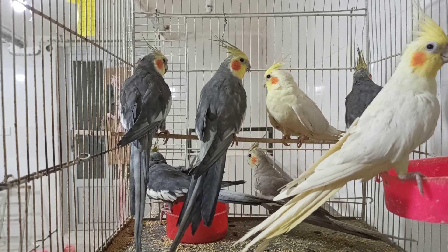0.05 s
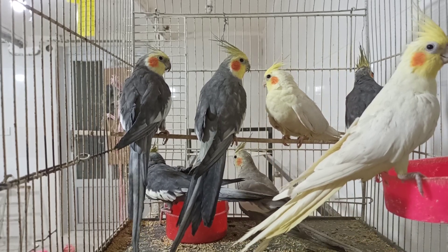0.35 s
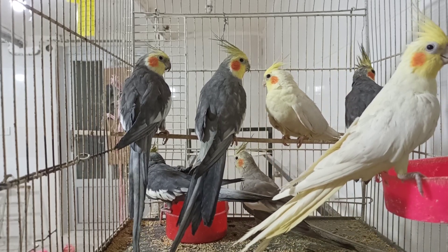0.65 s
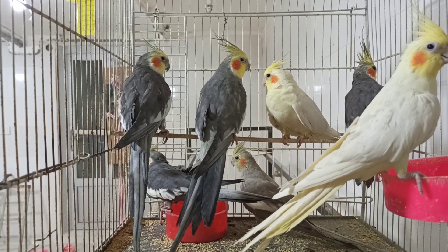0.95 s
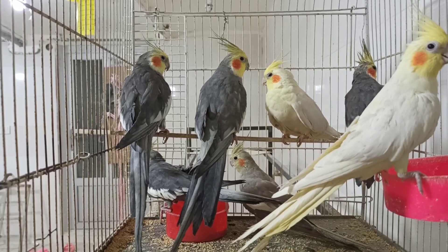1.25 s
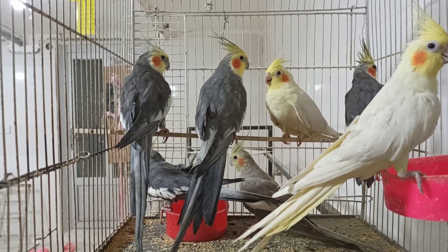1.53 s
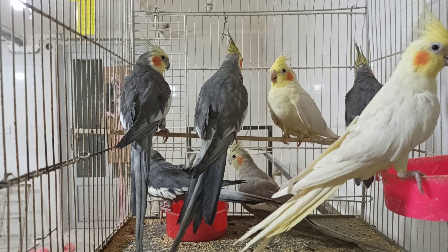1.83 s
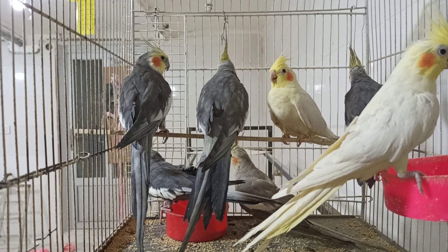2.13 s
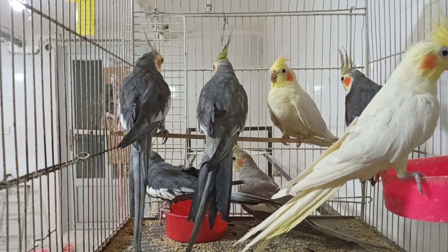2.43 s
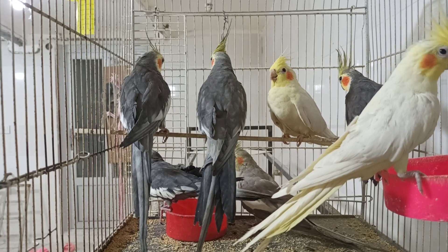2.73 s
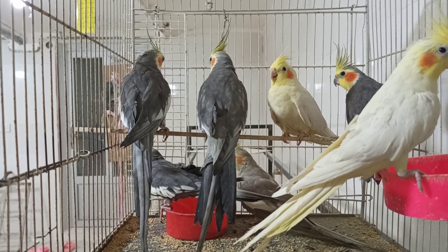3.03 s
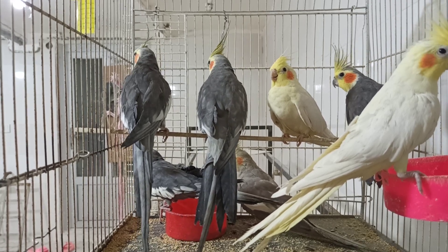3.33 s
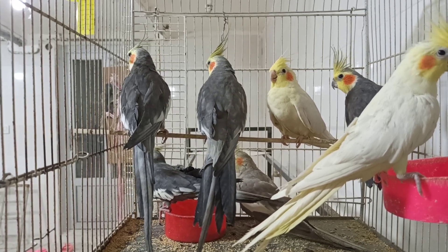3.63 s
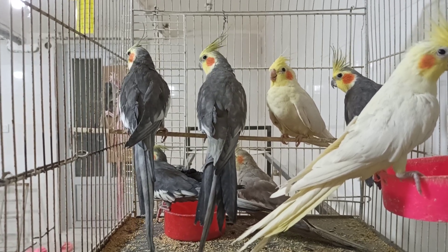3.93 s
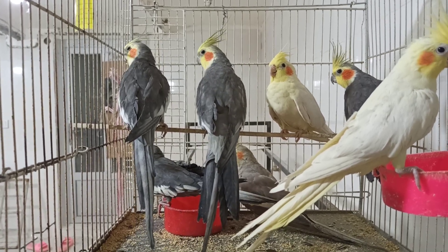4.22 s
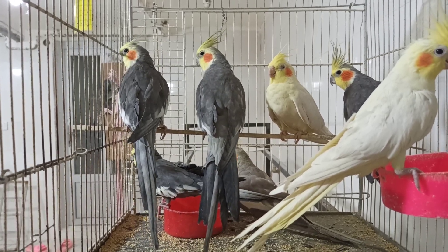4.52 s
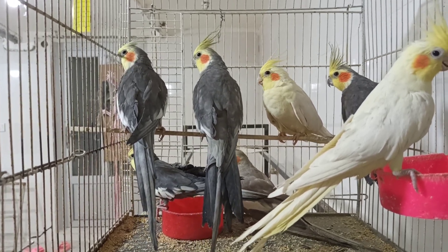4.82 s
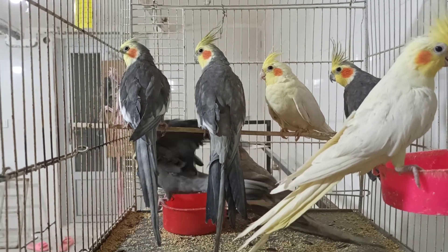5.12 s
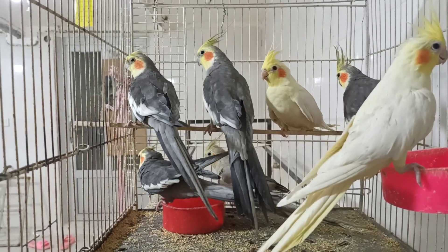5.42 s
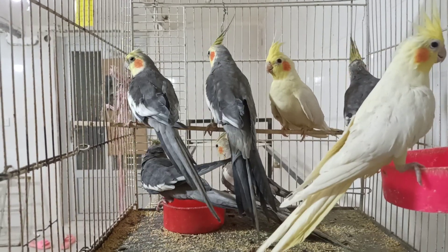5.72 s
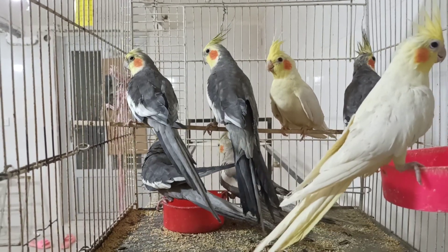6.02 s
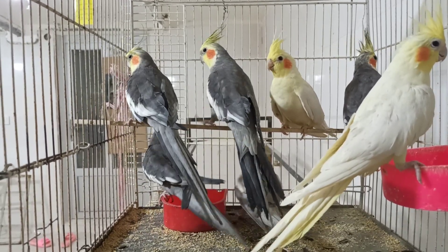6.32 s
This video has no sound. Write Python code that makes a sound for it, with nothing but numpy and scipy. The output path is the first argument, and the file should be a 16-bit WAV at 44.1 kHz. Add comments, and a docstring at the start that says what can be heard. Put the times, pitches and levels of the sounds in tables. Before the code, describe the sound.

Cockatiels call from a wire cage close to a stereo microphone, their voices echoing briefly in a hard-walled room. A loud, fluttering high call is already ending as the sound begins. A soft peep follows at about 0.8 seconds, among faint feather shuffles. At 1.6 seconds a farther whistle swings upward, followed by a soft sinking whine at 1.9, while a faint steady hum comes up over the quiet room tone and stays. A second loud fluttering call runs from 2.2 to 2.5 seconds. After a lull with light ticks and rustles, a rasping shriek climbs and frays from 4.2 to 4.5 seconds, with a lower bird note beneath it. Just after 5.1 seconds one bird flaps quickly and lands, and the cage rings softly, again at 5.5. Feathers rustle and claws tick on perch and wire until about 6.4 seconds.

```python
"""In a hard-walled room, cockatiels call from a wire cage close to a stereo phone: two fluttering contact
calls, a soft peep, a far rising whistle with a sinking whine after it, and a rasping shriek. Each voice is
a harmonic tone from the syrinx, shaped by the beak and answered by the walls. One bird flaps and lands,
the cage rings, feathers rustle and claws tick; a steady hum comes up over the quiet room tone."""
import sys
import numpy as np
from scipy import signal
from scipy.fft import rfft, irfft, next_fast_len
from scipy.io import wavfile
from scipy.ndimage import uniform_filter1d, minimum_filter1d, map_coordinates

SR = 44100
rng = np.random.default_rng(int(sys.argv[2]) if len(sys.argv) > 2 else 0)


def materialize(psi):
    """Save the field psi as 16-bit PCM at rate SR to the path in sys.argv[1].

    A 1-D psi becomes a single channel; in a 2-D psi each row is a channel.
    """
    bounded = np.clip(np.atleast_2d(psi).T, -1, 1)
    quanta = np.round(bounded * 32767).astype(np.int16)
    wavfile.write(sys.argv[1], SR, quanta)


N = 280476
PRE_ROLL = SR // 5  # lets the first call be under way as the scene opens
TIME = np.arange(-PRE_ROLL, N) / SR
COUNT = len(TIME)

# Throat and beak EQ, one curve per voice. Each row: frequency in Hz, relative gain in dB.
CONTACT_BEAK = [(1000, -27), (1700, -8), (2350, -6.3), (2900, -10.5), (3400, 6.5), (3950, 4.5),
                (4700, -2.5), (5400, -26), (6100, -9), (6700, -2.8), (7400, -12), (8500, -16.5),
                (11500, -33), (15400, -21)]
SOFT_BEAK = [(700, -1), (1400, -2), (2100, 10.5), (2800, -17.5), (3800, -18), (4600, -23), (6000, -40),
             (8000, -25.5), (15000, -22)]
WHISTLE_BEAK = [(800, -7), (1600, -7.5), (2900, 13.5), (3250, -28.5), (3650, 1), (4100, -20.5), (4750, -1),
                (5600, -28), (8000, -21), (12000, -32), (15000, -34.5)]
SHRIEK_BEAK = [(600, -43), (1150, -20), (1400, -13.5), (1900, 5.5), (3100, 8.5), (3380, -2.5), (3700, 6),
               (4150, -7.5), (4600, -6.5), (5400, -30), (6400, -3), (7100, -9.5), (8000, -18.5),
               (15000, -30.5)]
UNDERTONE_BEAK = [(800, -23), (1180, -17), (2300, -18), (3000, -6.5), (3600, 7), (4600, -5), (5500, -21),
                  (7200, -7), (15000, -35)]
# Contact calls. Each row: times of start, dip, push and flick in seconds, held pitch and dip depth in Hz,
# base level, push boost and flick boost in dB, flutter depth in Hz, reverb over direct in dB.
CONTACT_CALLS = [(-.19, .114, .152, .178, 2285, 125, -12.1, 10.5, 10, 38, -6),
                 (2.203, 2.381, 2.493, 2.502, 2430, 175, -13.8, 7, 6, 60, -3.8)]
# The peep and the whine. Each row: start and length in seconds, first pitch, last pitch and arch height
# in Hz, level in dB, rasp from 0 to 1.
SOFT_NOTES = [(.757, .075, 1290, 1150, 100, -39.5, .18), (1.91, .225, 1680, 1440, 10, -34, .27)]
# The low second voice under the shriek: one row with those same columns.
UNDERTONE = (4.215, .135, 1130, 1110, 120, -25.5, .22)
# Wing strokes. Each row: start in seconds, level in dB, decay in seconds.
WINGBEATS = [(5.114, -43, 0.055), (5.143, -31.5, 0.038), (5.168, -32, .03), (5.226, -49, 0.038)]
# Landing blows on the cage. Each row: start in seconds, level in dB.
LANDINGS = [(5.165, -42.5), (5.491, -51.5)]
# Ringing modes of the cage. Each row: frequency in Hz, gain in dB, time to fall 60 dB in seconds.
CAGE_MODES = [(134.7, -3, 0.8), (245.3, 4.5, 1.2), (270.2, -7.5, 3.2), (543, -5.5, .5), (866, -22, 0.24),
              (1095, -2, 0.35)]
# Claws and beaks on perch and wire. Each row: start in seconds, knock level in dB, snap level in dB.
TAPS = [(0.736, -78, -40), (3.516, -76, -38), (3.887, -69.5, -37.5), (4.596, -44.5, -26),
        (5.379, -37.5, -39), (5.495, -42.5, -61), (5.972, -66, -44.5), (6.197, -39.5, -27.5),
        (6.277, -45, -29), (6.327, -34.5, -33.5), (6.352, -42, -29)]
# Feather shuffles. Each row: start in seconds, time until the decay in seconds, relative level in dB.
SHUFFLES = [(.48, .03, -61), (.725, .14, -54), (.94, .07, -52), (1.06, .16, -54), (1.945, .08, -55),
            (2.875, .07, -56), (3.08, .18, -61), (3.505, .05, -55.5), (3.88, .04, -56.5), (4.02, .035, -62),
            (5.02, .1, -60), (5.14, .24, -53.5), (5.53, .19, -51.5), (5.965, .03, -56.5),
            (6.14, .22, -54.5)]
# Noise colours. Each row: frequency in Hz, relative spectral density in dB.
WING_COLOUR = [(35, -50), (60, -14), (234, -6), (355, -6.5), (551, -0.5), (1080, -5.5), (2200, -12.5),
               (2780, -10.5), (4950, -18.5), (7680, -9), (10900, -49), (11900, -25.5), (15000, -14)]
FEATHER_COLOUR = [(500, 5.5), (1200, 8), (2500, 0.5), (4300, 11), (5300, -1.5), (6500, 13.5), (7700, 13.5),
                  (9000, 6.5), (13500, 15), (15500, -25)]
ROOM_TONE_COLOUR = [(25, -9.5), (45, -28.5), (70, -1), (125, 3.5), (190, 1), (380, -3.5), (700, -11.5),
                    (1300, -20.5), (2000, -16.5), (2500, -22.5), (4400, -23.5), (5300, -28), (7000, -21),
                    (15000, -24.5)]
KNOCK_COLOUR = [(200, -21), (600, -6), (1150, -1.5), (1700, -10.5), (3000, -18), (9000, -20)]
SNAP_COLOUR = [(800, -44), (3000, -27), (7000, 2.5), (15000, 3)]
# Reverb bands. Each row: frequency in Hz, time to fall 60 dB in seconds, relative level in dB.
REVERB_BANDS = [(150, 1, 2), (1270, 1, -5.5), (2400, 0.98, -4), (3830, 0.87, -3), (6700, 0.67, -1.5),
                (14000, .7, -4.5)]
# Early reflections off the walls. Each row: delay in milliseconds, level against the whole tail in dB.
WALL_ECHOES = [(6.7, -14), (44, -22), (51, -23)]
# The phone's EQ. Each row: frequency in Hz, gain in dB.
PHONE_EQ = [(20, -12), (60, 1.5), (8300, -0.5), (9300, -28.5), (10800, -33), (11700, -7)]
# Where the birds sit. Each seat: reverb over direct in dB, left over right in dB, left lag in milliseconds.
WHISTLE_SEAT, SOFT_SEAT = (3, -3, .2), (5, 0, -.3)
SHRIEK_SEAT, UNDERTONE_SEAT = (-1, -1, -.23), (3, -1, -.41)


def cockatiel(gesture, beak, flutter_rate_hz=72.2, sag=.3, tremor=.003, subharmonic_db=-13, hiss_db=-13,
              closing_db=-6, breath_db=-35, edge_s=.002):
    """The syrinx sends harmonics through the beak; rasp breaks the pitch, doubles the period, adds hiss."""
    t, hz, db, rasp, flutter_depth_hz = gesture
    count = len(t)
    rasp = np.clip(rasp, 0, 1)
    # where the pitch plunges, the beak closes and narrows the sound to its second harmonic
    closing = uniform_filter1d(np.clip(-np.gradient(hz), 0, 1), size=200)
    jitter = lambda rate: wander(rate, count=SR // 2)[:count]
    flutter = np.sin(2 * np.pi * np.cumsum(flutter_rate_hz * (1 + .12 * jitter(40))) / SR)
    slips = sag * rasp * np.abs(np.tanh(jitter(600)))  # a rasping syrinx only slips below its note
    hz = (hz + flutter_depth_hz * flutter) * (1 + tremor * jitter(400) - slips)
    phase = 2 * np.pi * np.cumsum(hz) / SR
    tone, power = 0, 0
    for k in np.arange(1, 19) / 2:
        gain = undb(on_log(k * hz, beak) + closing_db * closing * abs(k - 2)) * (k * hz < SR / 2)
        if k % 1:  # partials halfway between the harmonics
            gain = gain * rasp * undb(subharmonic_db)
        tone = tone + gain * np.sin(k * phase)
        power = power + gain ** 2 / 2
    shimmer = 1 + rasp * np.tanh(jitter(600))
    voice = tone / np.sqrt(uniform_filter1d(power, size=200)) * shimmer
    voice += undb(hiss_db) * rasp * noise(beak, channels=1, count=SR // 2)[0, :count]
    voice += undb(breath_db) * rng.standard_normal(SR // 2)[:count]
    edges = ramp(t, t[0], edge_s) - ramp(t, t[-1] - edge_s, edge_s)
    return np.interp(TIME, t, voice * edges * undb(db), left=0, right=0)


def contact_call(start, dip, push, flick, held_hz, dip_hz, db, push_db, flick_db, flutter_depth_hz,
                 scoop_share=.32, scoop_s=.058, flick_share=.22, flick_s=.011):
    """Scoops up to a fluttering note, dips once, steadies in a last push and ends in a downward flick."""
    t = span(start, flick + flick_s)
    age = t - start
    scoop = scoop_share * np.exp(-age / scoop_s)
    plunge = ramp(t, flick, flick_s)
    effort = bump(t, push, width_s=.016)
    hz = held_hz * (1 - scoop - flick_share * plunge) - dip_hz * bump(t, dip, width_s=.03)
    attack_db = -21 * (1 - ramp(t, start, .011))
    muffle_db = -10.5 * (1 - ramp(t, start + .032, .005))  # soft until the beak opens
    accent_db = 7 * np.exp(-age / .05)  # the first push of air eases off
    db = db + attack_db + muffle_db + accent_db + push_db * effort + flick_db * np.sin(np.pi * plunge)
    rasp = .04 + .22 * (np.exp(-age / .02) + plunge ** 2)  # rough as it starts and stops
    steadying = 1 - .7 * np.maximum.accumulate(effort)
    return t, hz, db, rasp, flutter_depth_hz * steadying


def shriek(start=4.218, break_at=4.304, harsh_at=4.346, end=4.535, harsh_s=.077, switch_s=.009,
           release_s=.1, high_hz=3180, sag_hz_per_s=360, flutter_depth_hz=20):
    """Climbs and grows, breaks to a sagging high note, turns harsh for a moment, clears and frays away."""
    t = span(start, end)
    climb = ramp(t, start, break_at - start)
    high = ramp(t, break_at, switch_s)
    harsh = ramp(t, harsh_at, switch_s) - ramp(t, harsh_at + harsh_s, switch_s)
    fray = ramp(t, end - release_s, release_s) ** 2
    climb_hz, climb_db = blend(1560, 2600, climb), blend(-32, -10.5, climb)
    hz = blend(climb_hz, high_hz - sag_hz_per_s * (t - break_at), high)
    db = blend(climb_db, -10.3, high) - 5.7 * harsh + fade_db(t, attack_s=.012, release_s=release_s)
    rasp = blend(.42, .02, high) + .9 * harsh + .3 * fray
    return t, hz, db, rasp, flutter_depth_hz


def whistle(start=1.628, swing_at=1.741, end=1.885, swing_s=.023,
            low_hz=1620, climb_hz_per_s=2400, high_hz=2955, flutter_depth_hz=36):
    """A rough low note swings up to a clean high one: pitch, loudness and purity rise together."""
    t = span(start, end)
    swing = (1 + np.tanh((t - swing_at) / swing_s)) / 2
    hz = blend(low_hz + climb_hz_per_s * (t - start), high_hz, swing)
    db = blend(-32, -14.7, swing) + fade_db(t, attack_s=.05, release_s=.11)
    rasp = blend(.27, .02, swing)
    return t, hz, db, rasp, flutter_depth_hz


def arched_note(start, length, first_hz, last_hz, arch_hz, db, rasp, flutter_depth_hz=32):
    """A soft note whose glide from first to last pitch bows upward in the middle."""
    t = span(start, start + length)
    along = ramp(t, start, length)
    hz = blend(first_hz, last_hz, along) + arch_hz * np.sin(np.pi * along)
    return t, hz, db + fade_db(t, attack_s=.012, release_s=.3 * length), rasp, flutter_depth_hz


def seated_bird(gesture, beak, room, wet_db, pan_db, lag_ms):
    """One call from its seat, heard directly and through the room."""
    call = cockatiel(gesture, beak) / np.hypot(1, undb(wet_db))  # same total power at any wet/dry mix
    return pan(call, pan_db, lag_ms) + reverb(call, room, wet_db)


def wings(crackle_db=3, width=.48):
    """Each stroke pushes a puff of air through crackling feathers."""
    mid, side = noise(WING_COLOUR)
    strokes = sum(undb(db) * burst(start, decay_s, attack_s=.0017) for start, db, decay_s in WINGBEATS)
    return (mid + width * np.array([side, -side])) * strokes * undb(crackle_db * wander(300))


def cage_ring():
    """The wire frame and tray ring after each landing."""
    ring = 0
    for start, db in LANDINGS:
        for hz, mode_db, t60 in CAGE_MODES:
            envelope = undb(db + mode_db) * burst(start, t60 / np.log(1000), attack_s=.0066)
            ring = ring + envelope * np.sin(2 * np.pi * hz * (TIME - start))
    return pan(ring, 1.3)


def claw_ticks():
    """Each tap of claw or beak is a short snap with a duller knock of the perch under it."""
    knock, snap = noise(KNOCK_COLOUR), noise(SNAP_COLOUR)
    return sum(knock * undb(knock_db) * burst(start, decay_s=.007, attack_s=.00031)
               + snap * undb(snap_db) * burst(start, decay_s=.003, attack_s=.0002)
               for start, knock_db, snap_db in TAPS)


def feather_rustle(gain_db=2, grain_db=1.8, uneven_db=2.8, attack_s=.028, decay_s=.045):
    """Feathers slide over each other in a grainy hiss; each shuffle rises, holds unevenly and dies away."""
    envelope = 0
    for start, length, db in SHUFFLES:
        release = np.exp(-np.maximum(TIME - start - length, 0) / decay_s)
        envelope = envelope + undb(db) * ramp(TIME, start, attack_s) * release
    grain = undb(grain_db * wander(500))
    return noise(FEATHER_COLOUR) * envelope * grain * undb(gain_db + uneven_db * wander(35))


def room_response(build_s=.0078):
    """The walls return a few distinct echoes and a diffuse tail that builds, then dies treble first."""
    t = np.arange(SR) / SR
    spectrum = rfft(rng.standard_normal((2, SR)))
    hz = np.arange(spectrum.shape[1])
    centres_hz = np.array(REVERB_BANDS)[:, 0]
    tail = 0
    for share, (_, t60, db) in zip(np.eye(len(REVERB_BANDS)), REVERB_BANDS):
        band = irfft(spectrum * on_log(hz, np.c_[centres_hz, share]), SR)
        tail = tail + undb(db) * band * np.exp(-np.log(1000) * t / t60)
    tail = unit_rms(tail * (1 - np.exp(-t / build_s))) / np.sqrt(SR)
    for ms, db in WALL_ECHOES:
        for channel in tail:
            channel[int(ms * SR / 1000) + rng.integers(0, 30)] += undb(db)  # staggered left and right
    return tail


def reverb(x, room, wet_db):
    """The room's stereo return of a mono sound, at wet_db relative to that sound."""
    wet = signal.oaconvolve(x[None], room, axes=1)[:, :COUNT]
    return unit_rms(wet) * np.std(x) * undb(wet_db)


def hum(hz=305, faint_db=-62, full_db=-49.7, cage_boost_db=3, waver_db=.55):
    """A steady hum comes up; the cage briefly rings at the same pitch after the second landing."""
    db = blend(faint_db, full_db, ramp(TIME, start=1.7, length_s=.3))
    db = db + cage_boost_db * bump(TIME, centre=5.6, width_s=.35) + waver_db * wander(36)
    return pan(np.sqrt(2) * np.sin(2 * np.pi * hz * TIME) * undb(db), 5)


def room_tone(db=-54, bass_width=.3, wide_above_hz=900, drift_db=1):
    """A bed of rumble, nearly centred in the bass, under a faint wide hiss."""
    mid, side = noise(ROOM_TONE_COLOUR)
    treble = signal.sosfilt(signal.butter(1, wide_above_hz, "high", fs=SR, output="sos"), side)
    side = blend(treble, side, bass_width)
    return (mid + np.array([side, -side])) * undb(db + drift_db * wander(6.1))


def undb(db):
    """Decibels to gain."""
    return 10 ** (np.asarray(db) / 20)


def unit_rms(x):
    """Scale to rms 1."""
    return x / np.sqrt(np.mean(x ** 2))


def on_log(hz, points):
    """Read a curve of frequency and value pairs along a log-frequency axis."""
    points_hz, values = np.transpose(points)
    return np.interp(np.log(np.maximum(hz, 1)), np.log(points_hz), values)


def noise(colour, channels=2, count=COUNT):
    """Independent channels of coloured noise at rms 1."""
    size = next_fast_len(count)
    gain = undb(on_log(np.arange(size // 2 + 1) * SR / size, colour))
    white = rng.standard_normal((channels, size))
    return unit_rms(irfft(rfft(white) * gain, size)[:, :count])


def wander(rate, count=COUNT):
    """Smooth random modulation at rms 1, with rate new values a second."""
    knots = rng.standard_normal(count // 4)[:int(count * rate / SR) + 3]
    return unit_rms(map_coordinates(knots, [np.arange(count) * rate / SR], order=2))


def pan(x, pan_db, lag_ms=0):
    """Mono to stereo: the left side is pan_db louder and lag_ms later than the right."""
    left = np.interp(TIME - lag_ms / 1000, TIME, x)
    return np.array([left * undb(pan_db / 2), x * undb(-pan_db / 2)])


def span(start, end):
    """The sample times between two moments."""
    return TIME[(TIME >= start) & (TIME < end)]


def blend(first, second, share):
    """Crossfade from first at share 0 to second at share 1."""
    return first + (second - first) * share


def ramp(t, start, length_s):
    """A straight rise from 0 to 1."""
    return np.clip((t - start) / length_s, 0, 1)


def bump(t, centre, width_s):
    """A bell curve of height 1."""
    return np.exp(-((t - centre) / width_s) ** 2)


def burst(start, decay_s, attack_s):
    """A percussive envelope: quick rise, exponential fall."""
    age = np.clip(TIME - start, 0, 40 * decay_s)
    return (1 - np.exp(-age / attack_s)) * np.exp(-age / decay_s)


def fade_db(t, attack_s, release_s, floor_db=-21):
    """Attack from the floor, hold at 0 dB and release to the floor."""
    return floor_db * (1 - ramp(t, t[0], attack_s) + ramp(t, t[-1] - release_s, release_s))


def scene():
    """Calls and movement share one room, over hum and room tone; the far birds are mostly reverb."""
    room = room_response()
    foley = claw_ticks() + wings() + feather_rustle()
    mix = foley + reverb(foley[0], room, wet_db=-5) + cage_ring() + hum() + room_tone()
    for *call, wet_db in CONTACT_CALLS:
        mix += seated_bird(contact_call(*call), CONTACT_BEAK, room, wet_db, pan_db=-.3, lag_ms=-.1)
    for note in SOFT_NOTES:
        mix += seated_bird(arched_note(*note), SOFT_BEAK, room, *SOFT_SEAT)
    mix += seated_bird(whistle(), WHISTLE_BEAK, room, *WHISTLE_SEAT)
    mix += seated_bird(shriek(), SHRIEK_BEAK, room, *SHRIEK_SEAT)
    mix += seated_bird(arched_note(*UNDERTONE), UNDERTONE_BEAK, room, *UNDERTONE_SEAT)
    return mix[:, PRE_ROLL:]


def record(dry, ceiling=.8, top_hz=15600):
    """The phone thins the deep bass, is dull around 10 kHz, limits the highest peaks and cuts the top."""
    size = next_fast_len(COUNT)
    eq = undb(on_log(np.arange(size // 2 + 1) * SR / size, PHONE_EQ))
    heard = irfft(rfft(dry, size) * eq, size)[:, :N]
    # the limiter ducks both channels for a few milliseconds around each peak
    gain = ceiling / np.maximum(np.abs(heard).max(axis=0), ceiling)
    heard = heard * uniform_filter1d(minimum_filter1d(gain, size=441), size=441)
    return signal.sosfilt(signal.ellip(8, .2, 70, top_hz, fs=SR, output="sos"), heard)


dry = scene()
out = record(dry)
materialize(out)
```